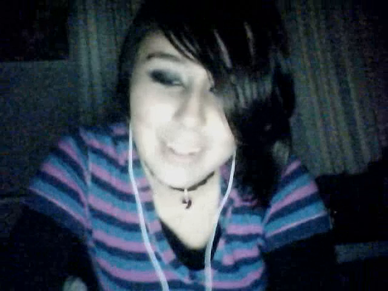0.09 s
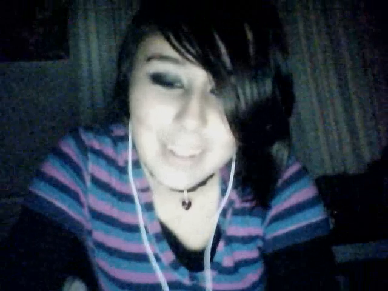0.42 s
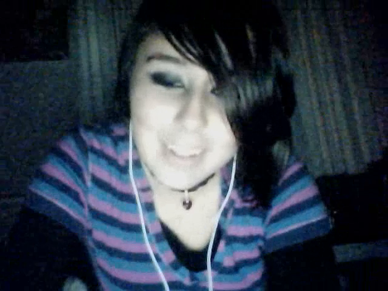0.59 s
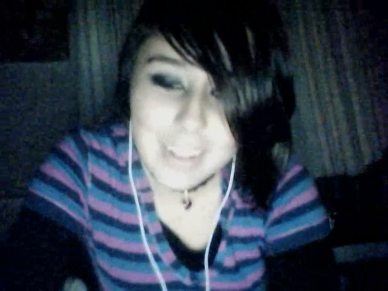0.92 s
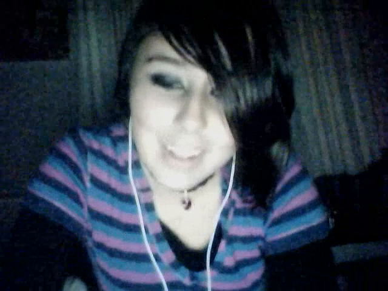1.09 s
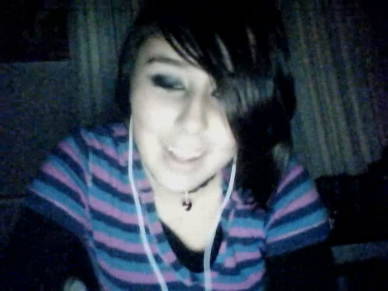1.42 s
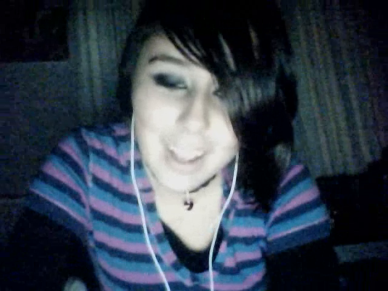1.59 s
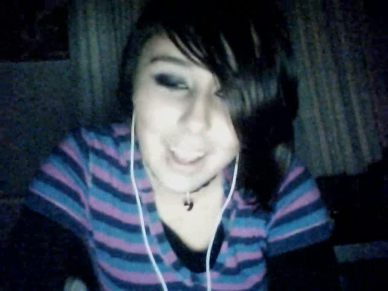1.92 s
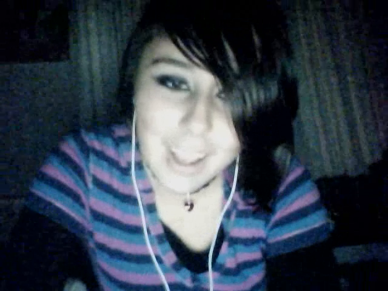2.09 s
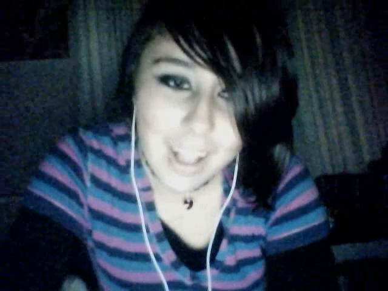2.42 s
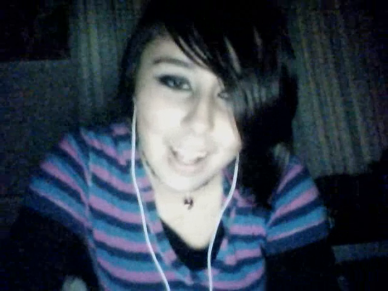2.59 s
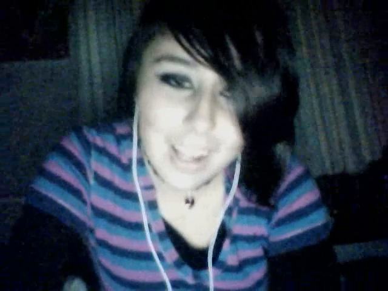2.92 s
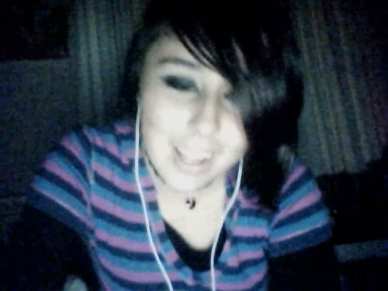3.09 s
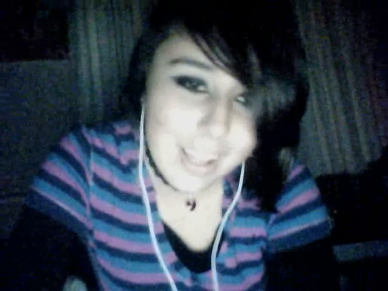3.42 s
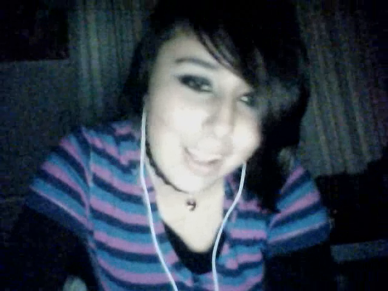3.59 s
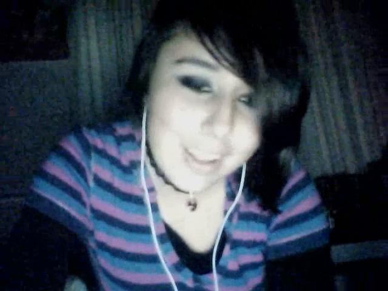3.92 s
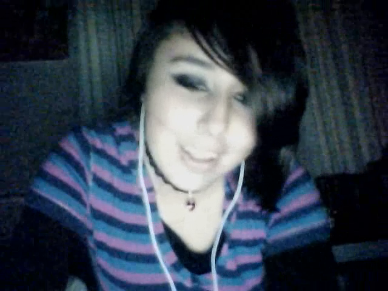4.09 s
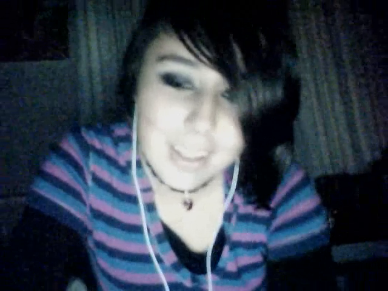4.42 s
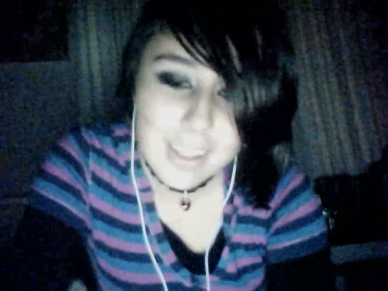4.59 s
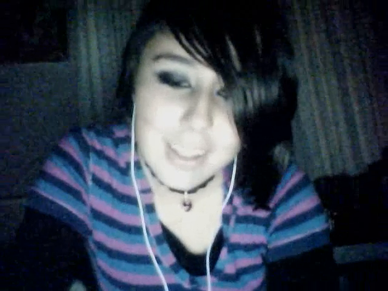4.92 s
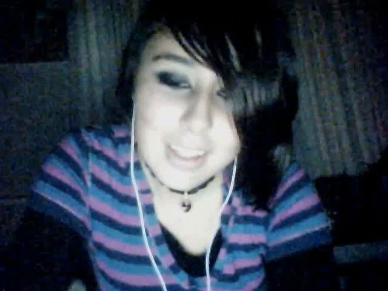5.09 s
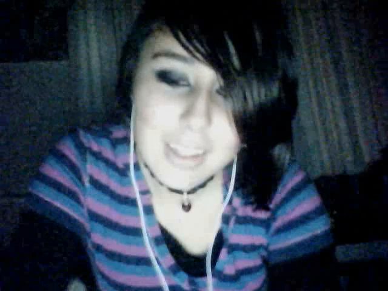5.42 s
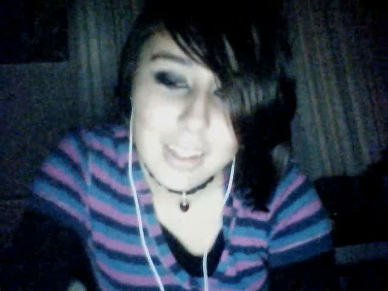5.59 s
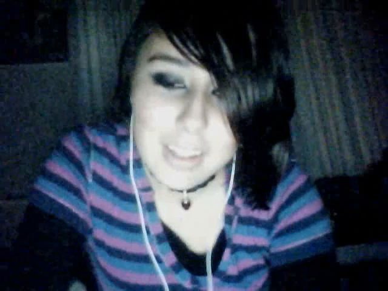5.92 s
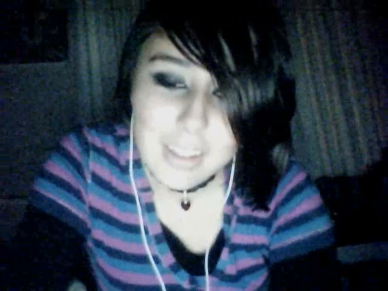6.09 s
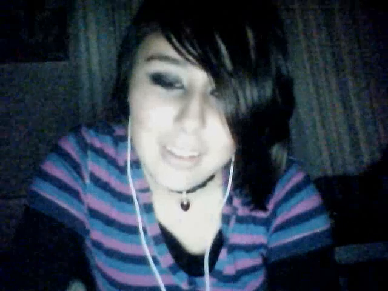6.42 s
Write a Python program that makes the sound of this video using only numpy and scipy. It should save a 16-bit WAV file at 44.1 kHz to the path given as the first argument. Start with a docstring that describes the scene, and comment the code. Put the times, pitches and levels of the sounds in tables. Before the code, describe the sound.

A computer keyboard is typed on very near the microphone, in a small quiet room with soft, slightly uneven hiss and a very faint whine around 1 kHz. From 0.1 to 1.3 s a few light keys click down and up, with fingertip taps and low, dull thumps. A pause follows, almost only hiss, until about 1.9 s; then faint brushes and soft keys, growing busier near 2.7 s. At 3.0 s the space bar lands with a sharp click and rattling clack, and fast, hard typing runs on: bright plastic snaps, key releases, loose rattles, case thumps sinking in pitch. More space bar clacks come near 3.9, 4.6, 5.6 and 6.0 s, each springing back about a tenth of a second later. Single strokes at 6.2 and 6.45 s close it. The tone is brittle, ringing near 6 kHz, with short echoes and overload on the hardest hits.

```python
"""Someone types on a computer keyboard in a quiet room: a few soft keys, a pause, then fast hard runs.
Keycaps click down and up and the space bar rattles: random contacts through resonances and modes.
Each stroke rocks the case with a low thump, a decaying sine that sinks in pitch.
Skin touches keycaps; filtered noise makes the hiss and a faint whine; sparse echoes make the room.
The nearby microphone rings near 6 kHz and overloads on the hardest strokes."""
import sys
import numpy as np
from scipy import signal
from scipy.fft import rfft, irfft
from scipy.io import wavfile
from scipy.ndimage import uniform_filter1d

SR = 44100
rng = np.random.default_rng(int(sys.argv[2]) if len(sys.argv) > 2 else 0)


def to_wav(sig):
    """Store sig (one row per channel, or 1-D mono) as 16-bit WAV at the path in sys.argv[1].

    Samples outside -1..1 are clipped; the rate is SR.
    """
    pcm = np.clip(np.atleast_2d(sig), -1, 1) * 32767
    pcm = np.round(pcm).astype(np.int16)
    wavfile.write(sys.argv[1], SR, pcm.T)  # frames by channels


N = 290178
T = np.arange(6000) / SR  # time axis of one stroke, s

# hiss spectrum, relative: freq_hz, density_db
HISS_SPECTRUM = [(20, 1), (60, -4), (150, -9.5), (400, -13.5), (800, -14.5), (980, -22.5), (1200, -18),
                 (2200, -24), (5500, -27.5), (6300, -21), (7100, -28), (10000, -31.5), (12500, -46),
                 (16000, -58)]
# ring time of the small room: freq_hz, t60_s
ROOM_DECAY = [(200, 0.38), (6000, 0.16), (12000, 0.15)]
# bright plastic snap as the microphone hears it, relative: freq_hz, level_db
SNAP_SPECTRUM = [(300, -44), (1000, -72), (2500, -21), (3700, -19), (4700, -12), (5900, -3), (6350, 1),
                 (6800, -4.5), (7600, -12.5), (11500, -34.5), (15500, -47)]
# dull knock of the key bed, relative: freq_hz, level_db
KNOCK_SPECTRUM = [(60, -23), (140, 5.5), (200, -0.5), (350, -4), (530, -9.5), (750, -17), (2000, -17.5),
                  (5000, -32.5), (15000, -59)]
# case modes: freq_hz, level_db, t60_s
CASE_MODES = [(1096, -9, 0.072), (1280, -3.5, 0.018), (2008, -5, 0.06), (2230, -4.5, 0.027),
              (2970, 14, 0.0024)]
# space bar modes: freq_hz, level_db, t60_s
BAR_MODES = [(5300, -2, 0.074), (5170, -9, 0.054), (6000, -2, 0.066), (6150, 1.5, 0.094), (6080, -8.5, .07),
             (6600, -6.5, 0.062)]

# fingertips tapping keycaps without pressing: start_s, level_db
TOUCH_EVENTS = [(0.15, -38.5), (0.161, -38), (.401, -35.5), (0.544, -34), (0.642, -25), (0.793, -42.5),
                (0.8817, -43.5), (0.977, -51), (1.204, -33), (1.295, -33), (2.007, -47.5), (2.072, -44),
                (2.134, -42.5), (2.223, -36), (2.415, -44), (2.631, -42), (3.462, -39), (3.495, -38),
                (3.542, -37), (3.675, -32), (3.706, -35.5), (3.965, -17), (4.175, -20), (4.226, -29),
                (4.395, -17), (4.428, -21), (4.455, -41), (4.818, -27), (4.91, -33), (5.506, -29),
                (5.782, -17)]
# fingertips dragging across keycaps: start_s, level_db, length_s
BRUSH_EVENTS = [(0.391, -46, 0.0082), (0.625, -39, .016), (1.912, -47.5, 0.034), (2.642, -40.5, 0.038),
                (2.899, -27.5, 0.041), (3.61, -31, 0.009), (5.28, -31.5, 0.029), (5.452, -33, 0.035),
                (5.707, -28, 0.0081)]
# hollow tocks of keys hit square on: start_s, level_db, cavity_hz
HOLLOW_EVENTS = [(2.2863, -44, 1960), (2.656, -46, 4570), (2.708, -43.5, 1870), (2.905, -45, 3360),
                 (2.912, -41, 560), (2.938, -47, 1620), (3.261, -26.5, 2870), (3.436, -32.5, 2020),
                 (3.596, -38.5, 2600), (4.27, -46, 1350), (5.013, -28, 1860), (5.12, -28, 1990),
                 (6.172, -43.5, 2870), (6.451, -30.5, 3600)]
# loose keys rattling after a hard stroke: start_s, level_db
RATTLE_EVENTS = [(2.831, -30), (4.473, -21), (4.807, -15.5)]
# space bar going down: start_s, click_db, rattle_db, far_end_rattle_db, ring_hz, thump_db
BAR_PRESSES = [(2.993, -0.5, -18, -15, 6000, -35.5), (3.866, -19, -8, -12, 6300, -31.5),
               (4.57, -2.5, -39, -10, 6300, -29), (5.6157, -12.5, -12.5, -14, 5750, -32),
               (5.955, -7, -8, -11, 6000, -34)]
# space bar flying back up: start_s, rattle_db, ring_hz
BAR_RELEASES = [(3.0987, -11, 6100), (3.9731, -3, 5770), (4.6811, -4, 5920), (5.7224, -7.5, 6000),
                (6.058, -11.5, 5860)]
# keys going down: start_s, click_db, ring_hz, case_knock_db, thump_db
KEY_PRESSES = [(0.0753, -20.5, 6370, -47, -39.5), (.539, -26.5, 6400, -43.5, -37.5),
               (0.644, -28, 7440, -39.5, -42), (.908, -82, 6700, -72, -35.5),
               (1.177, -32.5, 6350, -48, -38.5), (2.0405, -49.5, 7200, -55, -42),
               (2.3596, -34, 5400, -63, -48), (3.261, -8, 6700, -24.5, -35), (3.372, -33, 5000, -44, -41),
               (3.4355, -16, 5960, -33.5, -33.5), (3.5305, -25, 6400, -38.5, -40.5),
               (3.597, -24.5, 5260, -47.5, -50), (3.62, -33.5, 6550, -45, -36.5),
               (3.6931, -29, 5960, -38, -41.5), (4.1704, -14.5, 8140, -29, -30.5),
               (4.2602, -32.5, 5960, -39.5, -42.5), (4.385, -20.5, 8200, -34, -29),
               (4.7996, -9.5, 6250, -25, -27.5), (5.013, -17, 6400, -32.5, -34),
               (5.12, -22.5, 6500, -31, -42.5), (5.1989, -8.5, 7150, -26.5, -30),
               (5.268, -37, 5460, -49, -40.5), (5.384, -19, 6600, -37, -34),
               (5.771, -18, 8500, -25.5, -35.5), (6.1715, -20.5, 6400, -39, -36.5),
               (6.4498, -17.5, 5680, -28.5, -37.5)]
# keys springing back up: start_s, click_db, ring_hz, case_knock_db, thump_db
KEY_RELEASES = [(0.1895, -33.5, 5500, -34.5, -39), (1.0032, -51, 4420, -52, -56),
                (1.3019, -32, 8300, -37, -38.5), (2.239, -40, 4300, -43.5, -68),
                (2.6823, -40.5, 4540, -47, -55), (2.8299, -23, 5930, -39.5, -42),
                (2.907, -31.5, 6460, -41.5, -49), (2.94, -40, 4520, -48, -42),
                (3.3824, -25.5, 6500, -32.5, -62), (3.448, -25, 6160, -31, -52),
                (4.4709, -11, 5960, -33, -41), (4.9177, -21, 5600, -28, -34.5),
                (4.9362, -19.5, 9000, -36.5, -37.5), (4.982, -20.5, 5600, -42.5, -34),
                (5.054, -33.5, 8450, -36.5, -33), (5.4943, -24.5, 6950, -35, -34.5),
                (5.568, -22.5, 6200, -30.5, -36), (5.6917, -31.5, 6450, -44, -53),
                (5.8851, -28, 5600, -38, -44.5), (6.1962, -38, 6670, -39, -34.5),
                (6.29, -35, 5770, -44.5, -43.5), (6.5444, -30, 5170, -45, -53)]

EDGE_HZ = 15850  # band limit
PRESS_LAG_S, RELEASE_LAG_S = 0.03, 0.0088  # stroke to widest case swing
SWELL_S, SETTLE_S = 0.02547, 0.011  # swing build-up; typical settling time
PRESS_HZ, BAR_HZ, RELEASE_HZ = 79, 93, 112.6  # typical case pitch at widest swing
TOUCH_RING_DB, TOUCH_SOFT_HZ = 10.5, 11500  # key ring; skin damps the treble above
LEAD_IN_S, LEAD_IN_DB = 0.005, -24  # faint noise before each stroke; level re click
COLOUR_HZ = (3620, 8890)  # range of the random resonance of each stroke
KEY_BOUNCE_S, KEY_BOUNCE_DB = (0.0057, 0.014), -22  # delay range; level re first blow
BOUNCE_DOWN_S, BOUNCE_UP_S = 0.011, 0.0075  # delay of the bar's second clack


def amp(db):
    """Decibels to amplitude factor."""
    return 10 ** (np.asarray(db) / 20)


def read(points, hz):
    """Joins the points by straight lines on a log-frequency axis."""
    point_hz, value = np.transpose(points)
    return np.interp(np.log(hz + 1), np.log(point_hz + 1), value)


def add(mix, start_s, sound):
    """Adds a sound into the mix in place, cut at the end."""
    part = mix[max(round(start_s * SR), 0):][:len(sound)]
    part += sound[:len(part)]


def colour(x, points, ring_hz=6300, ring_db=0, ring_width=0.08, size=8192):
    """Minimum-phase filter with the given spectrum and one optional resonance."""
    hz = abs(np.fft.fftfreq(size, 1 / SR))
    db = read(points, hz) + ring_db / (1 + ((hz / ring_hz - 1) / ring_width) ** 2)
    log_response = np.conj(signal.hilbert(np.log(amp(db))))
    taps = np.fft.ifft(np.exp(log_response)).real[:size // 2]
    return signal.fftconvolve(x, taps)[:len(x)]


def at_level(x, db, seconds):
    """Scales a blow so that its energy, spread over the given time, has that level."""
    mean_square = np.sum(x ** 2) / (seconds * SR)
    return x * amp(db) / np.sqrt(mean_square + 1e-20)


def dying(t60_s):
    """Exponential decay, 60 dB in t60_s."""
    return np.exp(-np.log(1000) * T / t60_s)


def contacts(per_s, uneven_db=0):
    """A random train of tiny impacts, in clumps of a few milliseconds if uneven."""
    clumps = uniform_filter1d(rng.standard_normal(len(T)), size=130)
    force = rng.standard_normal(len(T))
    hits = rng.random(len(T)) < per_s / SR
    return force * hits * amp(uneven_db * clumps / clumps.std())


def ringing(force, modes):
    """A force sets a table of decaying sine modes ringing."""
    ring = np.zeros(len(T))
    for hz, db, t60_s in modes:
        ring += amp(db) * np.sin(2 * np.pi * (hz * T + rng.random())) * dying(t60_s)
    return signal.fftconvolve(force, ring)[:len(T)]


def hiss(db=-61.0, patchy_db=1.2):
    """Room and microphone noise whose level drifts a little, differently from band to band."""
    hz, _, bands = signal.stft(rng.standard_normal(N), SR, nperseg=1024, noverlap=768)
    patches = uniform_filter1d(rng.standard_normal(bands.shape), size=16, axis=0)
    patches = uniform_filter1d(patches, size=24, axis=1)
    bands = bands * amp(read(HISS_SPECTRUM, hz)[:, None] + patchy_db * patches / patches.std())
    noise = signal.istft(bands, SR, nperseg=1024, noverlap=768)[1][:N]
    return amp(db) * noise / noise.std()


def whine(db=-76.5, hz=1067, width_hz=26, waver_db=1.0):
    """A faint, fuzzy tone: narrow-band noise whose level wavers slowly."""
    f = np.fft.rfftfreq(N, 1 / SR)
    tone = irfft(rfft(rng.standard_normal(N)) / (1 + ((f - hz) / width_hz) ** 2), N)
    waver = irfft(rfft(rng.standard_normal(N)) * (f < 5), N)
    tone = tone * amp(waver_db * waver / waver.std())
    return amp(db) * tone / tone.std()


def room(x):
    """Sparse echoes of random sign, each band dying at its own speed."""
    signs = rng.choice([-1., 1.], SR // 2)
    taps = signs * (rng.random(SR // 2) < 3000 / SR)  # 3000 echoes per second
    taps *= np.arange(len(taps)) > 0.005 * SR
    hz, t, bands = signal.stft(taps, SR, nperseg=256)
    decay = np.exp(-np.log(1000) * t / read(ROOM_DECAY, hz)[:, None])
    tail = signal.istft(bands * decay, SR, nperseg=256)[1]
    return signal.fftconvolve(x, tail / np.linalg.norm(tail))[:N]


def sway(db, hz=29):
    """A few slow swings of the desk."""
    return amp(db) * np.sin(2 * np.pi * (hz * T + rng.random())) * signal.windows.hann(len(T))


def pat(db, top_hz=440):
    """The finger pad meets the key bed: contacts low-passed to a dry, dull pat."""
    push = colour(contacts(per_s=3900) * T * dying(0.076), KNOCK_SPECTRUM)
    lowpass = signal.butter(4, top_hz, fs=SR, output="sos")
    return at_level(signal.sosfilt(lowpass, push), db, 0.026)


def thump(db, hz, lead_s, glide=0.47):
    """The case swings on its feet: a sine that swells, settles and sinks in pitch."""
    t = T - lead_s
    settle_s = SETTLE_S * 2 ** rng.uniform(-0.5, 0.61)
    swing = np.where(t < 0, np.exp(-(t / 0.014) ** 2), 1 / np.cosh(t / settle_s))
    pitch_hz = hz * (1 - glide + glide * np.exp(-t / 0.029))
    turns = np.cumsum(pitch_hz) / SR
    onset = 1 - np.exp(-T / 0.0035)
    return amp(db + 1.5) * np.sin(2 * np.pi * (turns + rng.random())) * swing * onset


def rocking_case(bar_up_db=-39.5, spread=0.04, sway_db=-54, pat_db=-12):
    """Every press and release pats and rocks the case and sways the desk a little."""
    swings = [(s, PRESS_LAG_S, db, PRESS_HZ) for s, *_, db in KEY_PRESSES]
    swings += [(s, PRESS_LAG_S, db, BAR_HZ) for s, *_, db in BAR_PRESSES]
    swings += [(s, RELEASE_LAG_S, db, RELEASE_HZ) for s, *_, db in KEY_RELEASES]
    swings += [(s, RELEASE_LAG_S, bar_up_db, BAR_HZ) for s, *_ in BAR_RELEASES]
    out = np.zeros(N)
    for s, lag_s, db, hz in swings:
        swing_hz = hz * (1 + spread * rng.normal())
        add(out, s + lag_s - SWELL_S, thump(db, swing_hz, SWELL_S) + sway(sway_db))
        add(out, s, pat(db + pat_db))
    return out


def touch(db, seconds):
    """Soft skin drags on a keycap: a small clump of slips, then a faint shiver of the loose cap."""
    stroke = np.sin(np.pi * np.minimum(T / seconds, 1)) + amp(-11) * dying(0.11)
    slips = contacts(per_s=6900, uneven_db=2.5) * stroke
    soft = signal.sosfilt(signal.butter(2, TOUCH_SOFT_HZ, fs=SR, output="sos"), slips)
    ring_hz = rng.normal(6600, 250)
    return at_level(colour(soft, SNAP_SPECTRUM, ring_hz, ring_db=TOUCH_RING_DB), db, 0.0037)


def hollow(db, hz, width=0.21):
    """A dull, square blow sounds the cavity under a keycap: band-passed contacts."""
    blow = contacts(per_s=22000) * T * dying(0.0077)
    band_hz = [hz, hz * (1 + abs(width))] / np.sqrt(1 + abs(width))
    cavity = signal.butter(2, band_hz, "bandpass", fs=SR, output="sos")
    return at_level(signal.sosfilt(cavity, blow), db, 0.003)


def case(force):
    """A short tock of the shell, with its modes ringing more weakly."""
    tock = colour(force, [(300, -38.5), (1000, 5.5), (3300, 9.5), (6000, -18.5), (12000, -35.5)])
    return at_level(ringing(force, CASE_MODES), -4.0, 0.92) + at_level(tock, 0, 0.75)


def clack(rattle_db, ring_hz, case_db, knock_db):
    """A hard blow: loose keys chatter, strongest early, while the bar rings and the key bed knocks."""
    fade = np.exp(-(T / 0.0066) ** 2) + amp(-15.0) * dying(0.097)
    chatter = contacts(per_s=3500, uneven_db=2.0) * fade * (1 - np.exp(-T / 0.003))
    blow = contacts(per_s=7700) * dying(0.039) * (1 - np.exp(-T / 0.0018))
    rattle = colour(chatter, SNAP_SPECTRUM, ring_hz, ring_db=3.5)
    out = at_level(rattle, rattle_db + 1.5, 0.0081)
    out += at_level(ringing(chatter, BAR_MODES), rattle_db - 11, 0.0075)
    out += at_level(case(chatter), case_db, 0.0025)
    return out + at_level(colour(blow, KNOCK_SPECTRUM), knock_db, 0.0099)


def lead_in(db):
    """Faint noise swelling for 5 ms before each stroke, down or up."""
    swell = np.exp(np.minimum(T / LEAD_IN_S - 1, 0) * 4.5) * (T < LEAD_IN_S)
    noise = contacts(per_s=7900) * swell
    return at_level(colour(noise, SNAP_SPECTRUM), db, LEAD_IN_S)


def vary_colour(force, hz, ring_db=5, q=12):
    """A narrow resonance, at a pitch drawn at random, varies the colour of each stroke."""
    return force + amp(ring_db) * signal.lfilter(*signal.iirpeak(hz, q, fs=SR), force)


def click(db, key_hz, body_db):
    """A keycap strikes its stop, knocks the case, bounces once and shivers at the given pitch."""
    strike = contacts(per_s=13000) * (T / 0.0008) ** 2 * np.exp(-T / 0.00062)
    shiver_fade = dying(0.1 * rng.uniform(0.33, 2.0)) * (1 - np.exp(-T / 0.0012))
    shiver = contacts(per_s=3500, uneven_db=4.0) * shiver_fade
    colour_hz = rng.uniform(*COLOUR_HZ)
    snap = colour(vary_colour(strike, colour_hz), SNAP_SPECTRUM, key_hz, ring_db=9.5)
    out = at_level(snap, db, 0.0061)
    add(out, rng.uniform(*KEY_BOUNCE_S), amp(KEY_BOUNCE_DB) * out)
    ring = colour(vary_colour(shiver, colour_hz), SNAP_SPECTRUM, key_hz, ring_db=4.5, ring_width=0.062)
    out += at_level(ring, 0.53 * db - 20, 0.0044)  # relatively stronger on soft strokes
    out += at_level(case(strike), body_db, 0.0017)
    return out + at_level(colour(strike, KNOCK_SPECTRUM), body_db - 14.5, 0.0028)


def space_down(s, click_db, rattle_db, far_db, ring_hz):
    """One end of the long bar lands with a click and clack, then the other with a deeper clack."""
    return [(s - LEAD_IN_S, lead_in(click_db + LEAD_IN_DB)),
            (s, click(click_db, key_hz=ring_hz, body_db=-28.5)),
            (s, clack(rattle_db, ring_hz, case_db=-29.0, knock_db=-41)),
            (s + BOUNCE_DOWN_S, clack(far_db, ring_hz, case_db=-32.0, knock_db=-33))]


def space_up(s, db, ring_hz):
    """The bar flies back against its stops, rings the case and bounces once."""
    return [(s - LEAD_IN_S, lead_in(db - 19.5)),
            (s, clack(db, ring_hz, case_db=db - 16.5, knock_db=db - 23.0)),
            (s + BOUNCE_UP_S, clack(db - 6.5, ring_hz, case_db=db - 28.5, knock_db=db - 27.0))]


def keycaps():
    """Everything that clicks, rattles or is touched, placed in time."""
    sounds = []
    for s, db, key_hz, knock_db, _ in [*KEY_PRESSES, *KEY_RELEASES]:
        sounds += [(s - LEAD_IN_S, lead_in(db + LEAD_IN_DB)), (s, click(db, key_hz, knock_db))]
    for s, click_db, rattle_db, far_db, ring_hz, _ in BAR_PRESSES:
        sounds += space_down(s, click_db, rattle_db, far_db, ring_hz)
    for s, db, ring_hz in BAR_RELEASES:
        sounds += space_up(s, db, ring_hz)
    for s, db in RATTLE_EVENTS:
        sounds.append((s, clack(db, ring_hz=6000, case_db=db - 27.0, knock_db=db - 16.0)))
    sounds += [(s, hollow(db, hz)) for s, db, hz in HOLLOW_EVENTS]
    sounds += [(s, touch(db, seconds=0.0032)) for s, db in TOUCH_EVENTS]
    sounds += [(s, touch(db, length_s)) for s, db, length_s in BRUSH_EVENTS]
    out = np.zeros(N)
    for s, sound in sounds:
        add(out, s, sound)
    return out


def scene():
    """Keys and rocking case close by, with a little room, hiss and whine."""
    keys, rocking = keycaps(), rocking_case()
    near = amp(-2.5) * keys + rocking
    echoes = amp(-18.0) * room(keys) + amp(-18.0) * room(rocking)
    return (near + echoes + hiss() + whine())[None]


def record(dry):
    """The input overloads, saturating at 0.86 (4x oversampled); then the band limit."""
    fine = signal.resample_poly(dry, 4, 1, axis=1)
    limited = fine / (1 + (fine / 0.86) ** 8) ** (1 / 8)
    clipped = signal.resample_poly(limited, 1, 4, axis=1)
    lowpass = signal.firwin(511, EDGE_HZ, window=("kaiser", 9), fs=SR)
    return signal.oaconvolve(clipped, lowpass[None], "same")


dry = scene()
out = record(dry)
to_wav(out)
```